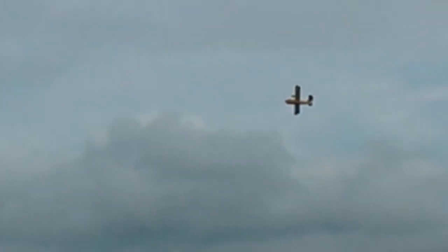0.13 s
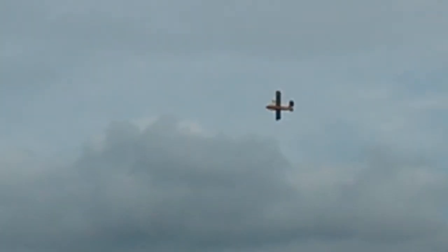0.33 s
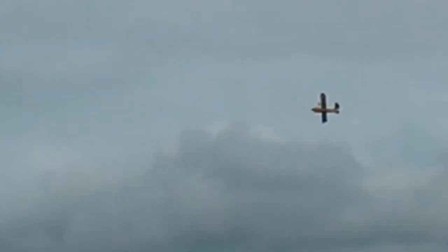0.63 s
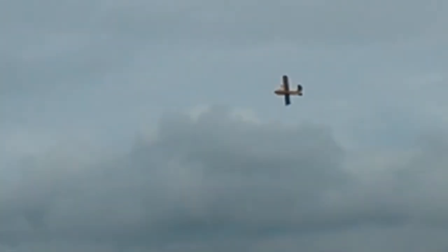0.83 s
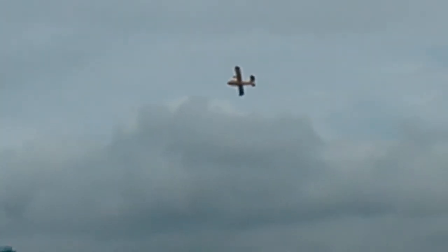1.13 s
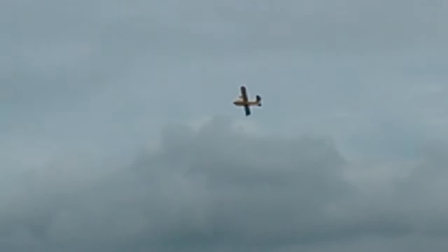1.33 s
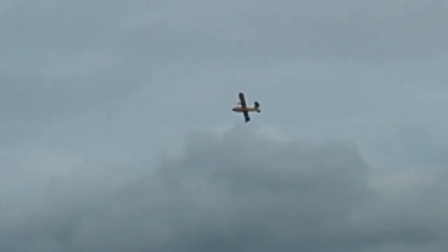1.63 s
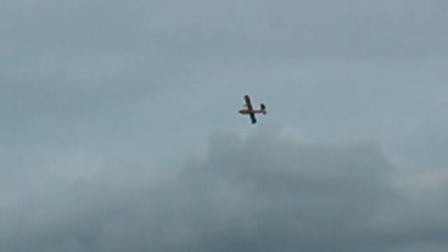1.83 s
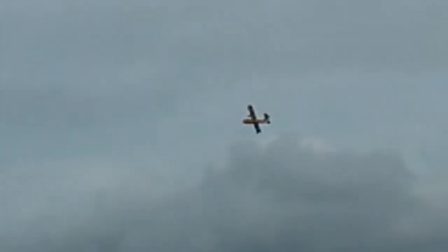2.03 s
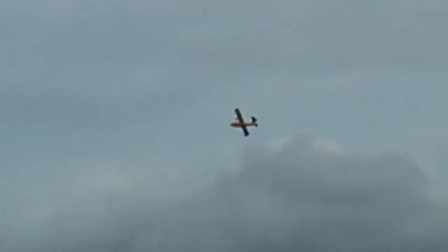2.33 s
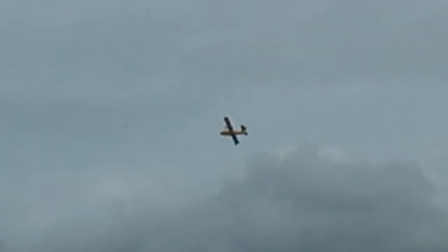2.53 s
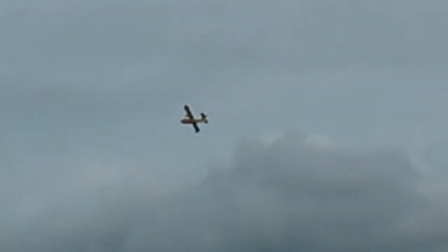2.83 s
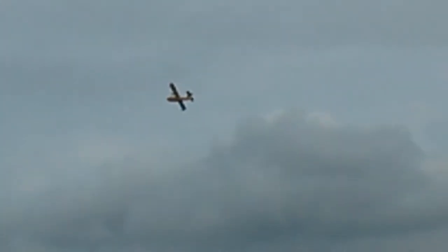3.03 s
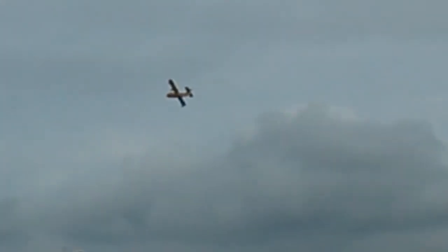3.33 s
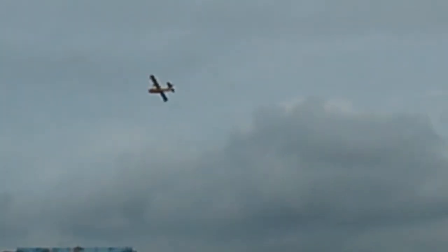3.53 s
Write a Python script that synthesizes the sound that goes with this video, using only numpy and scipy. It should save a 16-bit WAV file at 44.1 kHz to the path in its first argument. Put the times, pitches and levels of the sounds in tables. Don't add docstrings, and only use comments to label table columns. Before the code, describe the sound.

Small propeller aircraft drones low and distant overhead, its pitch slowly sinking in a light breeze

```python
import sys
import numpy as np
from scipy import signal
from scipy.fft import rfft, irfft, next_fast_len
from scipy.io import wavfile
from scipy.ndimage import uniform_filter1d, map_coordinates

SR = 44100
rng = np.random.default_rng(int(sys.argv[2]) if len(sys.argv) > 2 else 0)


def attenuation_scalar(level_db):
    decades = np.asarray(level_db, float) / 20
    return 10 ** decades


def wrap_up_sound(samples):
    columns = np.atleast_2d(samples).T
    tamed = np.clip(columns, -1, 1)
    steps = np.round(tamed * 32767).astype(np.int16)
    wavfile.write(sys.argv[1], SR, steps)


N = 162729
TIME = np.arange(N) / SR


def unit(x):
    return x / np.sqrt(np.mean(x ** 2) + 1e-20)


def curve(rows):
    s, value = np.transpose(rows)
    return np.interp(TIME, s, value)


def wobble(rate):
    knots = rng.standard_normal(int(N * rate / SR) + 4)
    return map_coordinates(knots, [np.arange(N) * rate / SR])


def bumps(rows, t):
    return sum(db * np.exp(-((t - s) / half) ** 4) for s, half, db in rows)


def rush(spectrum, patchy_db):
    z = signal.stft(rng.standard_normal(N + SR), nperseg=2048)[2]
    field = uniform_filter1d(rng.standard_normal(z.shape), size=4, axis=0)
    field = uniform_filter1d(field, size=3, axis=1)
    patchy = signal.istft(z * attenuation_scalar(patchy_db * unit(field)), nperseg=2048)[1]
    size = next_fast_len(len(patchy))
    f, level = np.transpose(spectrum)
    log_hz = np.log(np.fft.rfftfreq(size, 1 / SR) + 1)
    colour = np.interp(log_hz, np.log(f + 1), level, left=-120, right=-120)
    return unit(irfft(rfft(patchy, size) * attenuation_scalar(colour), size)[:N])


# t/s, blade rate f/Hz
BLADE_RATE = [
    (0, 86.14),
    (.5, 86.7),
    (.95, 85.13),
    (1.4, 84.44),
    (1.85, 82.85),
    (2.3, 82.34),
    (2.8, 80.91),
    (3.25, 79.38),
    (3.69, 79.26),
]


def aircraft():
    passes = np.cumsum(curve(BLADE_RATE)) / SR
    return blade_tones(passes) + shaft_tones(passes) + roar(passes)


def tone(turns, db):
    flicker_db, phase_sway_rad = 0.73, 0.24
    shaken = 2 * np.pi * (turns + rng.random()) + phase_sway_rad * wobble(13)
    return np.sqrt(2) * attenuation_scalar(db + flicker_db * wobble(12)) * np.sin(shaken)


# t/s, level/dB
FADE_1 = [(0, -42), (.2, -45.5), (.37, -48.5), (.48, -39.5), (.62, -38), (.7, -33), (.95, -30), (1.4, -29),
          (1.9, -31), (2.25, -28.5), (2.6, -31), (2.92, -31.5), (2.98, -30.5), (3.05, -33), (3.18, -35.5),
          (3.27, -29), (3.4, -30.5), (3.52, -35.5), (3.57, -32.5), (3.69, -36)]
FADE_2 = [(0, -31.5), (.45, -29), (0.662, -33.5), (1.13, -37), (1.4, -34.5), (1.951, -36.5), (2.069, -47),
          (2.199, -37), (2.35, -47.5), (2.5, -36.5), (2.64, -40), (2.69, -56), (2.78, -47.5), (2.85, -40),
          (3.01, -35.5), (3.07, -40), (3.115, -55), (3.16, -40), (3.221, -35.5), (3.38, -40.5), (3.55, -50),
          (3.69, -35)]
FADE_3 = [(0, -70), (0.401, -55), (0.9, -70.5), (1.1, -46.5), (1.299, -68), (1.451, -50), (1.671, -38.5),
          (1.85, -39), (2.068, -34), (2.25, -42), (2.36, -53), (2.45, -46), (2.53, -55), (2.58, -38),
          (2.74, -40.5), (2.85, -42.5), (3.0, -37), (3.14, -32.5), (3.69, -34.5)]
FADE_4 = [(0, -57.5), (0.599, -75), (.67, -42), (.85, -38.5), (1.151, -42.5), (1.349, -51.5),
          (1.451, -63.5), (1.571, -51), (1.749, -48.5), (1.828, -64.5), (2.149, -51.5), (2.351, -73.5),
          (2.801, -50), (3.12, -51.5), (3.3, -54), (3.69, -60)]
FADE_5 = [(0, -57), (.3, -82), (.9, -59), (1.05, -49), (1.22, -73), (1.35, -55), (1.65, -63.5), (1.85, -61),
          (1.98, -51), (2.1, -67), (2.33, -56.5), (2.45, -52), (2.6, -58.5), (2.72, -53), (3.1, -54.5),
          (3.3, -74), (3.69, -62)]
FADE_6 = [(0, -55), (.15, -67), (.58, -61.5), (.7, -60.5), (.85, -47), (1.0, -54), (1.25, -62.5),
          (1.45, -61), (1.7, -74), (2.08, -70.5), (2.16, -58.5), (2.3, -64), (2.6, -63.5), (2.7, -57),
          (2.97, -55.5), (3.1, -66), (3.69, -77)]


def blade_tones(passes):
    upper_sway_db = 4
    levels = [curve(rows) for rows in (FADE_1, FADE_2, FADE_3, FADE_4)]
    levels += [curve(rows) + upper_sway_db * wobble(12) for rows in (FADE_5, FADE_6)]
    return sum(tone(order * passes, db) for order, db in enumerate(levels, 1))


# multiple of shaft rate, level/dB
SHAFT_ORDERS = [
    (2, -48.5),
    (4, -58.5),
    (5, -59),
]


def shaft_tones(passes):
    blades, sway_db = 3, 3
    return sum(tone(multiple * passes / blades, db + sway_db * wobble(5.1))
               for multiple, db in SHAFT_ORDERS)


# t/s, level/dB
ROAR_LEVEL = [(0, -44.5), (.3, -46.5), (.45, -49.5), (.6, -47), (.85, -43), (1.2, -48), (1.6, -52.5),
              (2.2, -51.5), (2.45, -50.5), (2.75, -46), (2.93, -48.5), (3.15, -45), (3.4, -49), (3.69, -45)]
# f/Hz, level/dB per Hz
ROAR_SPECTRUM = [(55, -28), (130, -1), (215, 7), (300, -2), (600, -6), (950, -11.5), (1100, -11.5),
                 (1200, -24.5)]


def roar(passes):
    chop = 1 + 0.42 * np.cos(2 * np.pi * passes)
    level = attenuation_scalar(curve(ROAR_LEVEL) + 0.7 * wobble(5.6))
    return chop * level * rush(ROAR_SPECTRUM, patchy_db=3.5)


# t/s, level/dB
WIND_STRENGTH = [(0, -49), (.05, -55.5), (.3, -60), (.55, -59), (.68, -56), (.9, -61.5), (1.15, -65),
                 (1.5, -68.5), (1.7, -70), (1.85, -66), (2.1, -66.5), (2.4, -61.5), (2.75, -60.5),
                 (3.15, -57.5), (3.45, -58), (3.69, -53)]
# t/s, half length/s, level/dB
RUSTLE_BUMPS = [(0.392, 0.019, 3.5), (0.583, 0.032, 3), (0.712, 0.052, -0.5), (0.9, 0.071, 3),
                (0.961, 0.013, 3), (1.09, 0.036, 4.5), (2.102, 0.01, 5.5), (2.248, 0.022, 3),
                (2.499, 0.011, 2), (2.58, 0.11, .5), (2.71, 0.015, 0), (3.38, 0.1, -0.5)]


def breeze():
    strength_db = curve(WIND_STRENGTH)
    rustle_db = bumps(RUSTLE_BUMPS, TIME)
    return leaves(strength_db, rustle_db) + twigs(strength_db, rustle_db) + air(strength_db, rustle_db)


# t/s, level/dB
LEAF_LEVEL = [(0, -3.5), (.1, -6), (.3, -8.5), (.34, -14), (.75, -15), (.95, -10), (1.1, -9), (1.5, -9),
              (2.2, -6.5), (2.35, -10), (2.4, -3), (2.6, -4.5), (2.8, -1), (3.15, -2), (3.4, -2.5),
              (3.69, -6)]
# f/Hz, level/dB per Hz
DULL_BUSH = [(4000, -30), (5700, -9), (7000, 0), (9000, 0), (11000, -1.5), (11400, -6), (13400, -9),
             (15500, -14)]
# f/Hz, level/dB per Hz
BRIGHT_BUSH = [(4000, -30), (5900, -12), (6900, -4.5), (11000, 0), (11300, -8), (13300, -9), (13800, -15),
               (15500, -24)]


def leaves(strength_db, rustle_db):
    lull_s = 1.6
    hiss = np.where(TIME < lull_s, rush(DULL_BUSH, patchy_db=2.56), rush(BRIGHT_BUSH, patchy_db=1.73))
    return attenuation_scalar(strength_db + curve(LEAF_LEVEL) + rustle_db + 0.51 * wobble(16)) * hiss


# t/s, level/dB
TWIG_LEVEL = [(0, -5), (.1, -3), (.22, -6), (.6, -9.5), (.7, -3), (.8, -6), (.92, -9), (1.07, -5),
              (1.2, -6), (1.6, -5.5), (1.9, -7), (2.2, -5), (2.45, -4), (2.6, -4), (2.75, -0.5), (3.0, -1),
              (3.25, -1.5), (3.38, -8), (3.52, -5.5), (3.69, -4.5)]
# f/Hz, level/dB per Hz
TWIG_SPECTRUM = [(1900, -25.5), (2300, -0.5), (2700, 0.5), (3500, -4.5), (4300, -10), (5000, -12),
                 (5800, -16), (7000, -36.5)]


def twigs(strength_db, rustle_db):
    level = attenuation_scalar(strength_db + curve(TWIG_LEVEL) + rustle_db / 2 + 0.9 * wobble(11))
    return level * rush(TWIG_SPECTRUM, patchy_db=3.5)


# f/Hz, level/dB per Hz
AIR_SPECTRUM = [(300, -6), (700, -4.5), (1250, 3.5), (2200, 2.5), (2700, -7), (3200, -30)]


def air(strength_db, rustle_db):
    level = attenuation_scalar(strength_db + 0.16 + rustle_db / 2 + 0.81 * wobble(7.9))
    return level * rush(AIR_SPECTRUM, patchy_db=3.5)


# t/s, pitch f/Hz, glide/(Hz per s), length/s, level/dB
BODY_PUFFS = [(.012, 842, 0, 0.013, -43), (.158, 236, -2, 0.012, -38.5), (0.128, 724, -3500, 0.03, -49.5),
              (0.178, 618, 902, .02, -48), (.262, 829, 603, 0.012, -46), (.035, 633, 0, 0.018, -48.5),
              (.35, 507, 0, 0.011, -51), (0.042, 1130, 0, 0.015, -51.5), (0.116, 1080, 0, .03, -55),
              (.42, 1085, -2, 0.0122, -53.5), (.49, 1090, -4, 0.025, -53), (.625, 1061, 0, .015, -54),
              (0.666, 52.4, 0, 0.017, -37), (2.501, 45, -7, 0.083, -43.5), (2.465, 648.7, 2, 0.028, -56.5),
              (2.523, 651, 0, 0.028, -55), (2.661, 676, 0, .025, -56), (2.693, 286, 701, 0.065, -54),
              (3.312, 616, 0, 0.017, -51), (3.368, 692, 402, 0.018, -53.5), (3.417, 1087, 2, 0.015, -57),
              (3.629, 1090, 0, 0.037, -62)]


def puffs():
    total = np.zeros(N)
    for s, hz, glide, length, db in BODY_PUFFS:
        t = TIME - s
        rough = 1 + 0.6 * wobble(90)
        swell = np.exp(-0.5 * (t / length) ** 2)
        total += attenuation_scalar(db) * rough * swell * np.sin(2 * np.pi * t * (hz + glide * t / 2))
    return total


# t/s, level/dB
RUMBLE_LEVEL = [(0, -52), (.28, -42), (.4, -58.5), (.5, -50), (.7, -41.5), (1.1, -53), (1.5, -57),
                (2.2, -57.5), (2.5, -39.5), (2.7, -44), (2.9, -54), (3.2, -52), (3.69, -55)]
# f/Hz, level/dB per Hz
RUMBLE_SPECTRUM = [(20, -35), (33, -25), (42, -2), (52, 0), (66, -5), (75, -14), (150, -30), (300, -70)]


def rumble():
    return attenuation_scalar(curve(RUMBLE_LEVEL) - 0.5 * wobble(7.3)) * rush(RUMBLE_SPECTRUM, patchy_db=2.5)


def scene():
    return (aircraft() + breeze() + puffs() + rumble())[None]


# f/Hz, level/dB
MUTE_LIMIT = [(1500, -101), (2400, -92.5), (3000, -92), (4000, -94), (5900, -92.5), (7000, -95.5),
              (11000, -94), (11300, -89.5), (14000, -91)]
# t/s, half length/s, level/dB
SPARE_MOMENTS = [(.02, .04, 6), (.105, .017, 8), (.23, .015, 4), (.28, .035, 3), (.39, .027, 4),
                 (.465, .015, 2), (.583, .047, 4), (.8, .06, 1.5), (1.6, .45, -1), (2.4, .03, 6.5),
                 (2.45, .018, -3), (2.495, .016, 7), (2.59, .07, -2.5), (2.71, .045, 6), (2.82, .045, 5),
                 (2.915, .015, 5), (3.005, .035, 5), (3.065, .018, -3), (3.11, .018, 4), (3.195, .04, 4),
                 (3.345, .022, 4), (3.315, .016, -4), (3.42, .045, -2.5), (3.5, .022, 6), (3.59, .028, 5),
                 (3.68, .015, 4)]


def muted(x):
    frame, frame_start, narrow_bins, wide_bins = 1024, 688, 8, 32
    frame_sway_db, band_sway_db = 0.7, 1.4
    lead = frame - frame_start
    window = signal.windows.kaiser_bessel_derived(2 * frame, 4 * np.pi)
    hz, t, z = signal.stft(np.pad(x, (lead, 0)), SR, window, nperseg=2 * frame)
    edges = [0]
    while edges[-1] < frame - wide_bins:
        edges.append(edges[-1] + int(np.clip(edges[-1] // 44 * 4, narrow_bins, wide_bins)))
    widths = np.diff(edges + [len(hz)])
    power = np.add.reduceat(abs(z) ** 2, edges, axis=0) / widths[:, None]
    limit_db = np.interp(hz[edges], *np.transpose(MUTE_LIMIT), left=-200)[:, None]
    limit_db = limit_db + frame_sway_db * rng.standard_normal(len(t))
    limit_db += band_sway_db * rng.standard_normal(power.shape)
    limit_db -= bumps(SPARE_MOMENTS, t - lead / SR)
    keep = np.repeat(power > attenuation_scalar(2 * limit_db), widths, axis=0)
    return signal.istft(z * keep, SR, window, nperseg=2 * frame)[1][lead:lead + N]


def band_limit(x):
    return signal.sosfilt(signal.butter(12, 15300, fs=SR, output="sos"), x)


def record(dry):
    mix = muted(dry[0])[None]
    return band_limit(mix)


dry = scene()
out = record(dry)
wrap_up_sound(out)
```